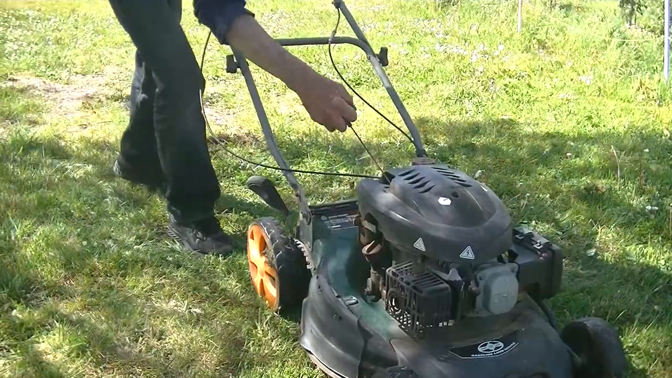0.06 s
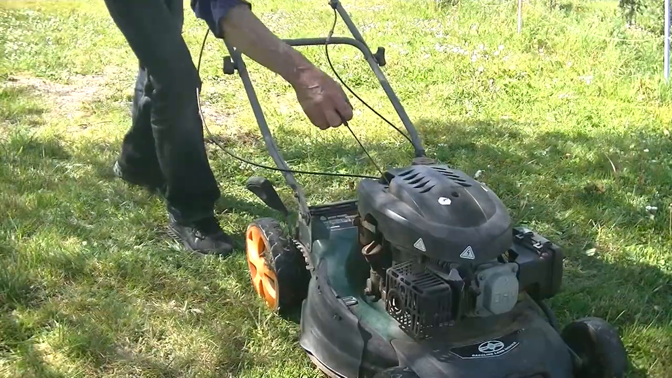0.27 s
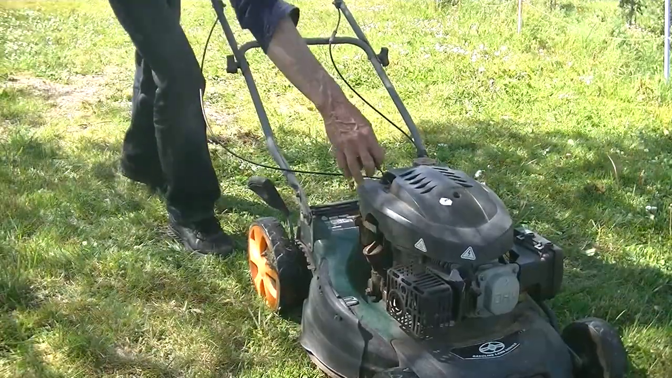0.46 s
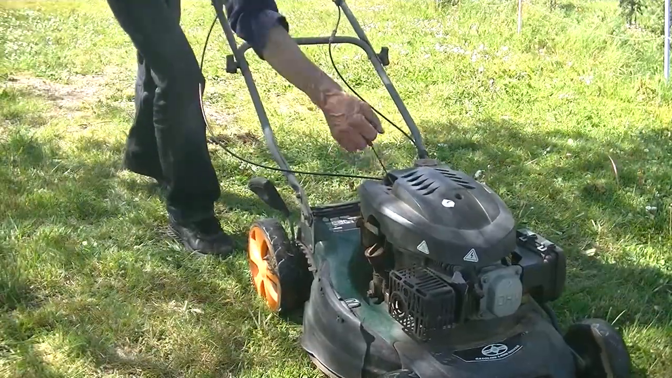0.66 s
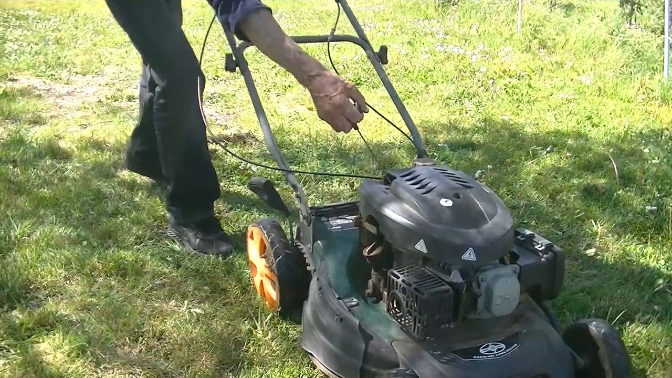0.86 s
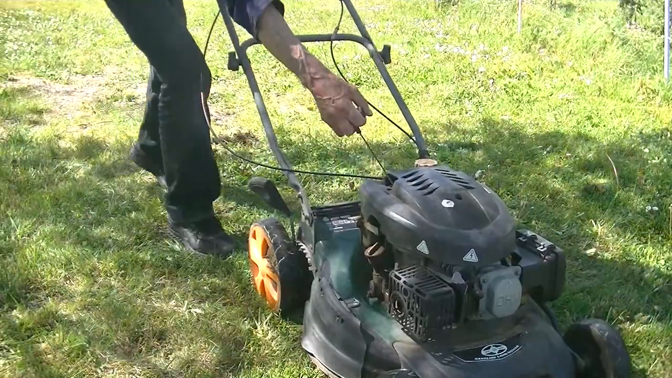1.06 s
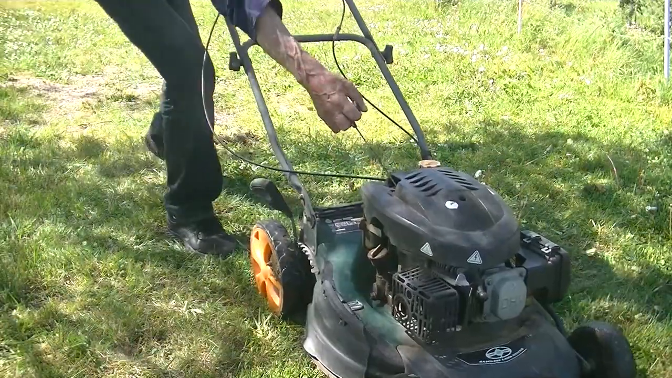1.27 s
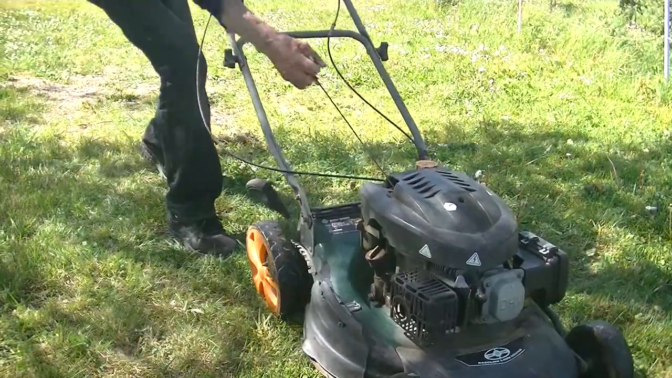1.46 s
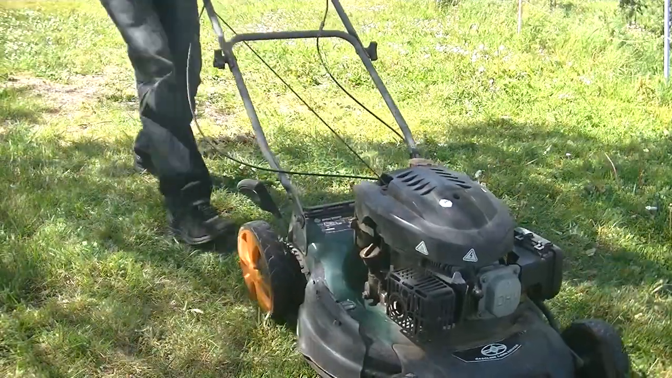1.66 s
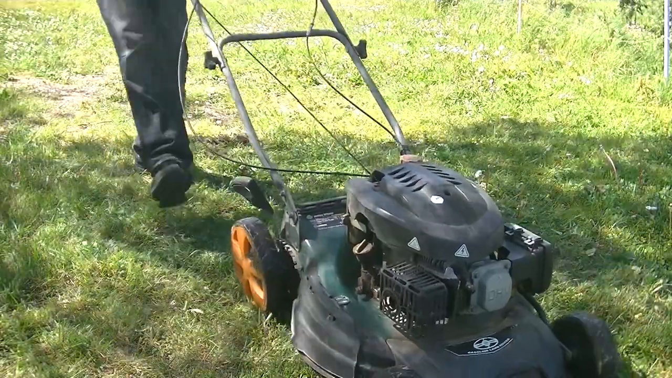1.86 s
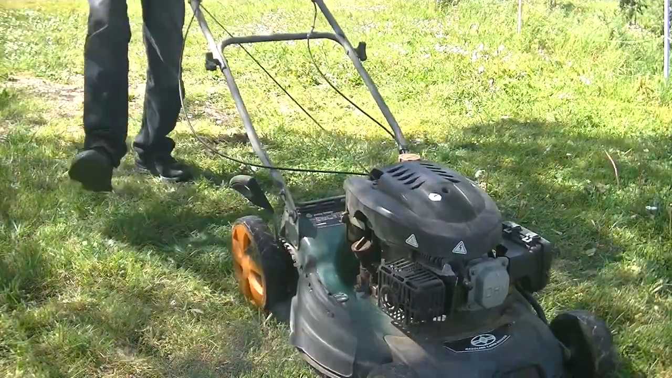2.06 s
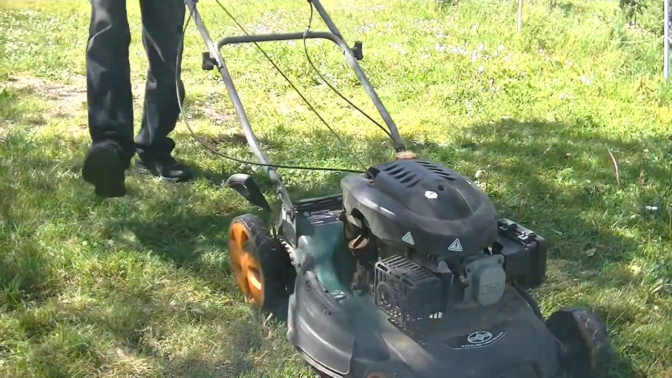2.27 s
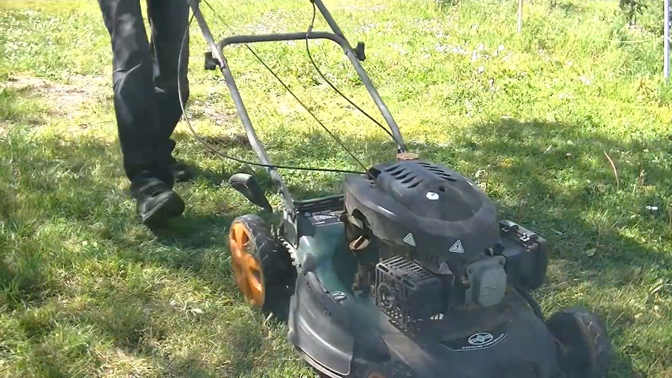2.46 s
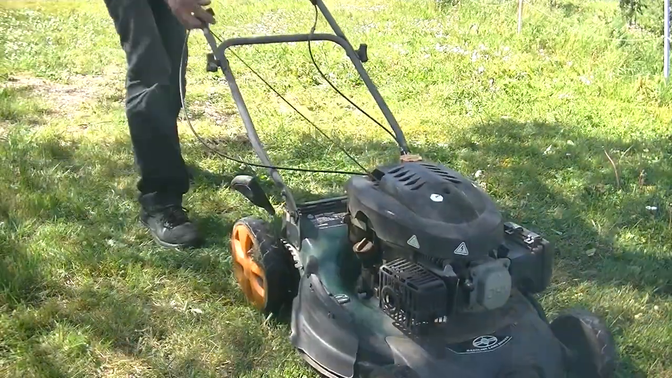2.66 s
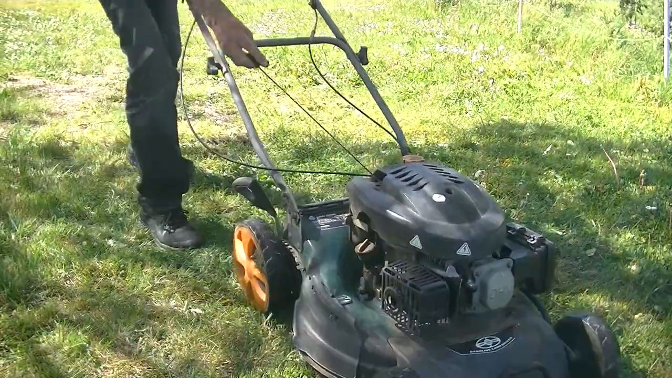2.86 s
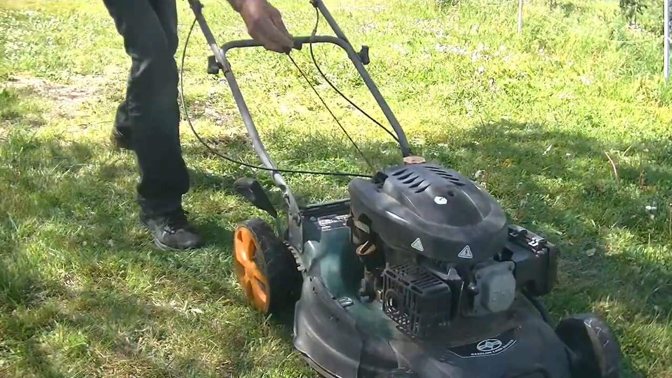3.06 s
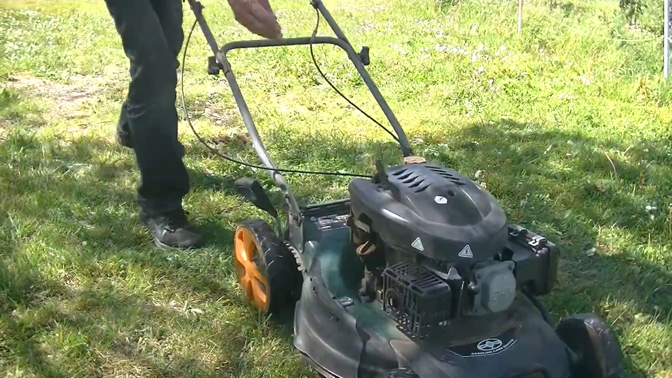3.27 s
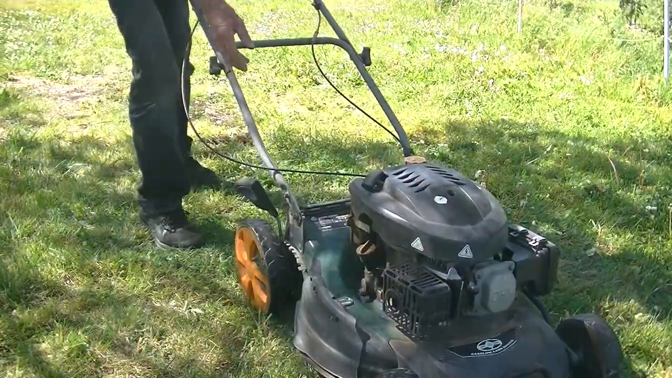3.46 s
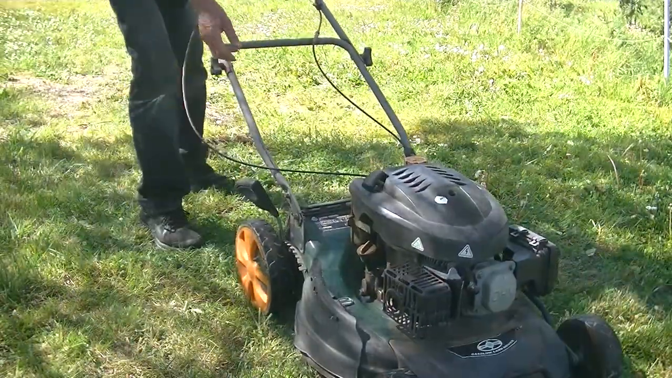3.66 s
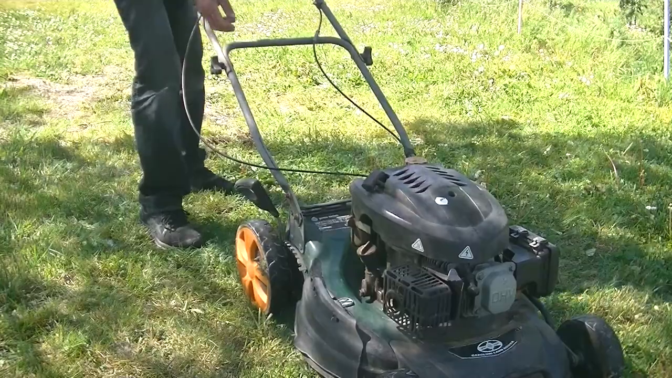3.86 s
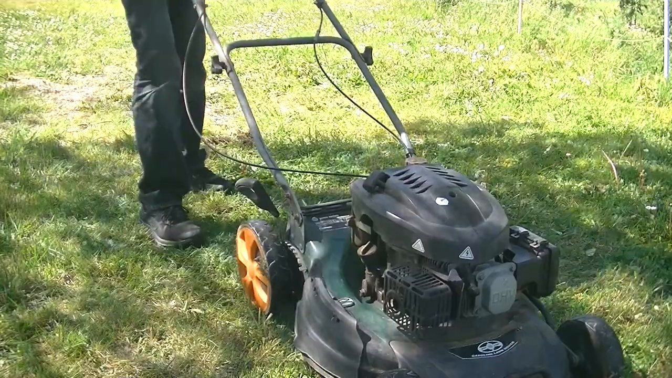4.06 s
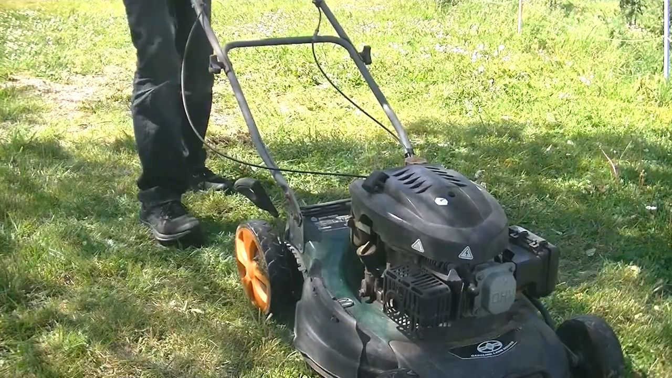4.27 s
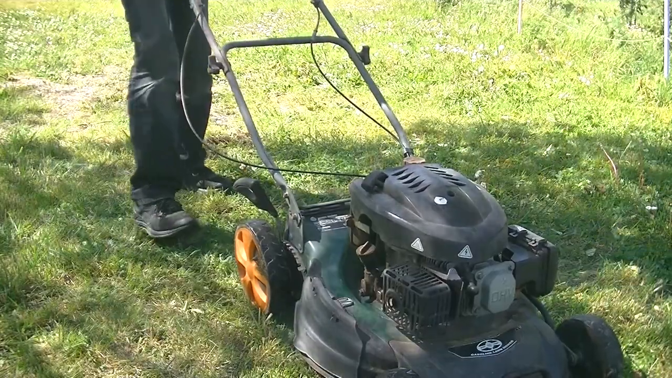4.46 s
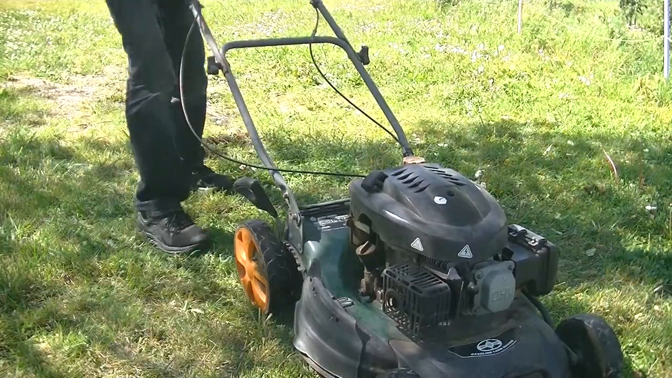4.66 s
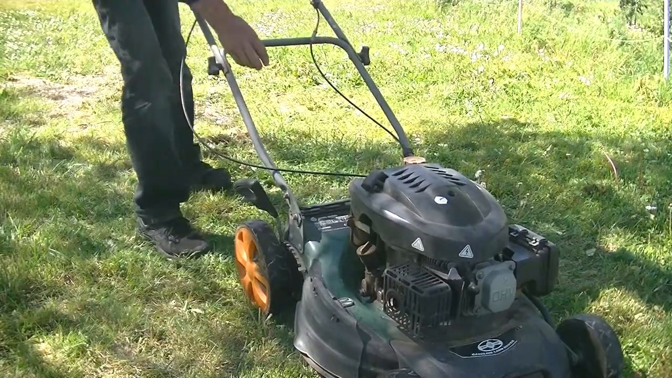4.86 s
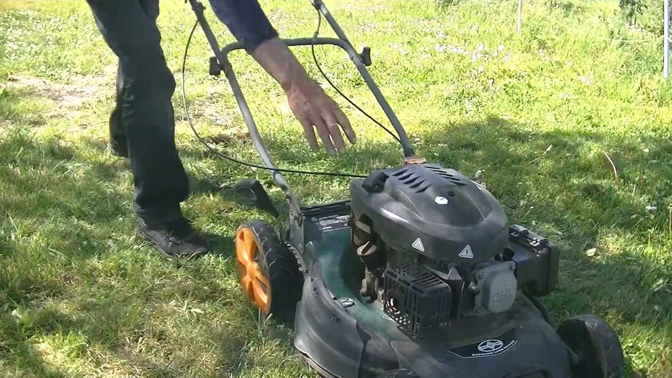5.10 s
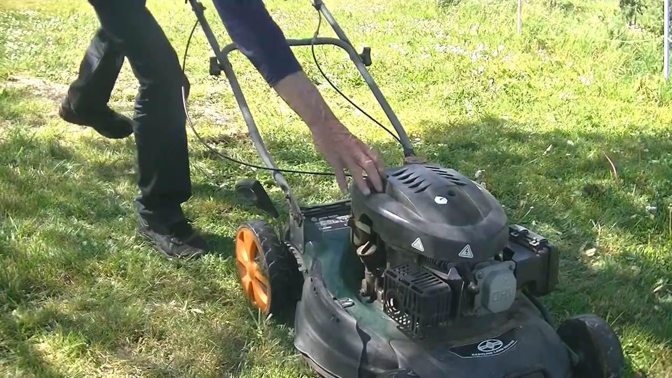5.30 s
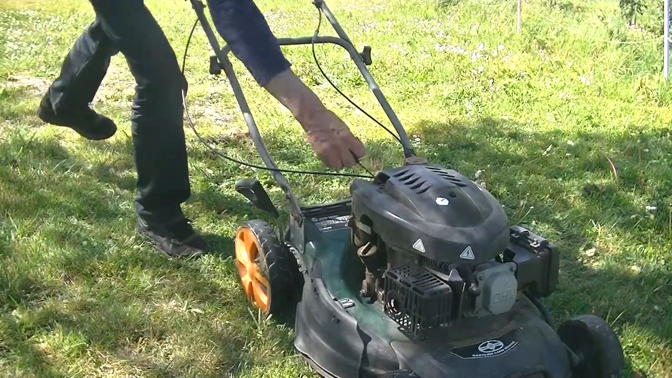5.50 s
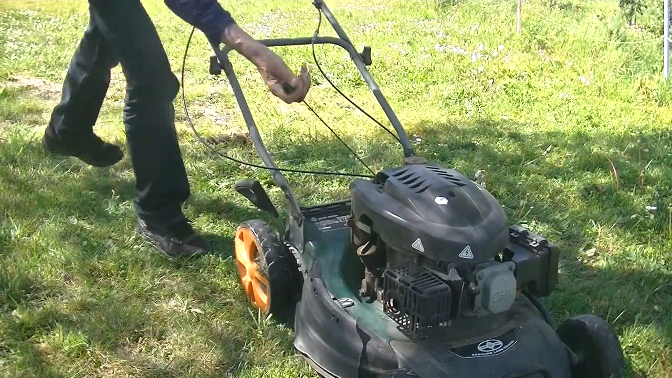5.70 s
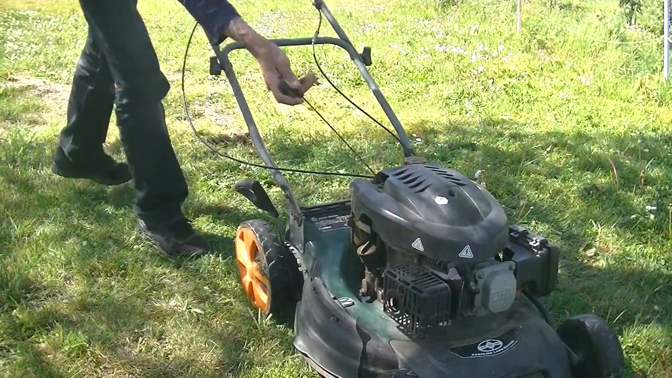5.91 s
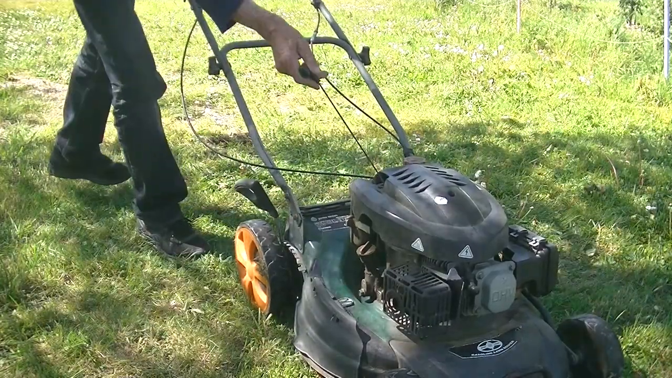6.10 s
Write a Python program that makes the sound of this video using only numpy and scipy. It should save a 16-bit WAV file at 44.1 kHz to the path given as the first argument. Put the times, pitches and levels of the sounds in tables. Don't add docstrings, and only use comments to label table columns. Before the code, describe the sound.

A small petrol lawn mower is pulled into life in a quiet garden, its clattering engine settling to a rapid even throb with a few sharp clacks.

```python
import sys
import numpy as np
from scipy import signal
from scipy.fft import rfft, irfft, next_fast_len
from scipy.io import wavfile
from scipy.ndimage import uniform_filter1d

SR = 44100
rng = np.random.default_rng(int(sys.argv[2]) if len(sys.argv) > 2 else 0)


def materialize(psi):
    bounded = np.clip(np.atleast_2d(psi).T, -1, 1)
    quanta = np.round(bounded * 32767).astype(np.int16)
    wavfile.write(sys.argv[1], SR, quanta)


def boost(x):
    u = np.asarray(x, float) / 20
    return 10 ** u


N = 270893

# (time [s], casing clatter [dB], throttle opening [0-1 once running, beyond that range at
ENGINE = [(1.4, -76, 1.0), (1.5, -74, 1.2), (1.58, -62, 0.7), (1.64, -60, 0.2), (1.66, -52, -.6),
          (1.73, -49, 0.46), (1.8, -50.5, 0), (1.87, -46, 0), (1.95, -45.5, 0.06), (2.38, -43.5, 0.13),
          (2.45, -45, 0.35), (2.75, -44, 0.1), (3.87, -44.5, 0.22), (3.93, -44, 0.55), (5.3, -44, 0.86),
          (5.6, -46.5, .8), (5.85, -44.5, 0.83), (6.14, -45.5, 0.99)]
# (place in cycle [share], level re steady rattle [dB], tilt [dB per octave],
# rise [share of cycle], fall [s], pressure pulse [about -1..1])
CONTACTS = [
    (-.05, 2.5, -2.5, 0.12, 0.002, -0.29),
    (-.02, 12.5, 3, 0.01, 0.0031, -1.18),
    (0.312, -1, -3.5, 0.024, 0.0048, 0.32),
    (.42, 5, -0.5, 0.035, 0.0042, 0.44),
    (0.572, -4.5, 2, 0.085, 0.01, -0.12),
    (.66, 2.5, -2.3, 0.038, 0.0033, .1),
    (0.812, 0, -3, 0.016, 0.0081, -0.42),
]
# (time [s], length [s], level [dB], hardness [dB], mode struck squarely [Hz])
JINGLE = [
    (.731, .01, -55, 8, 2878),
    (1.905, .055, -36, -3, 2878),
    (3.342, .026, -49, 11, 9680),
    (5.512, .08, -37.5, 4.5, 3131),
    (5.603, .075, -38, 3.5, 2712),
    (5.69, .04, -38, 3, 3131),
    (5.741, .028, -37, -1, 2878),
    (6.063, .012, -36, 6, 2878),
]
RUB_RISE_S = 0.0084
CATCH_S = 2.04


def rms_one(x):
    return x / np.sqrt(np.mean(x ** 2) + 1e-20)


def in_time(rows, outside=None):
    s, *columns = np.transpose(rows)
    return [np.interp(np.arange(N) / SR, s, c, outside, outside) for c in columns]


def at_hz(points, hz):
    points = np.array(points)
    return np.interp(np.log(hz + 1), np.log(points[:, 0] + 1), points[:, 1])


def shaped(x, gain):
    size = next_fast_len(N + 4096)
    return irfft(rfft(x, size) * gain(np.fft.rfftfreq(size, 1 / SR)), size)[..., :N]


def band(x, low_hz, high_hz):
    sos = signal.butter(2, [low_hz, min(high_hz, .45 * SR)], "band", fs=SR, output="sos")
    return signal.sosfilt(sos, x)


def resonance(x, hz, width_hz):
    r = np.exp(-np.pi * width_hz / SR)
    feedback = [1, -2 * r * np.cos(2 * np.pi * hz / SR), r * r]
    return signal.lfilter((1 - r * r) / 2 * np.array([1, 0, -1]), feedback, x)


def ring(clicks, hz, t60):
    width_hz = np.log(1000) / np.pi / t60
    return resonance(clicks + 1e-18, hz, width_hz) * SR * t60 / np.log(1000) / 2


def grit(per_s, spread_db):
    sizes = boost(spread_db * np.minimum(rng.exponential(1, N), 5)) * rng.choice([-1, 1], N)
    return rms_one(sizes * (rng.random(N) < per_s / SR))


def garden(patchy_db):
    # (frequency [Hz], level [dB per Hz])
    garden_colour = [(35, -76), (60, -44), (121, -24), (217, -9.5), (287, -16.5), (315, -10), (346, -7),
                     (636, -11.5), (1740, -9), (1950, -6), (2090, -5), (4200, -5), (5000, -13), (6600, -14),
                     (12700, -27.5), (16000, -25)]
    # (frequency [Hz], likeness [-1..1])
    likeness = [(60, -0.5), (180, 0.5), (550, 0.9), (1650, 0.81), (4970, 0.65), (15000, -0.26)]
    level_db = -61.5
    mid, side = rng.standard_normal((2, N))
    alike = lambda hz: np.clip(at_hz(likeness, hz), -1, 1)
    mid = shaped(mid, lambda hz: boost(at_hz(garden_colour, hz)) * np.sqrt(1 + alike(hz)))
    side = shaped(side, lambda hz: boost(at_hz(garden_colour, hz)) * np.sqrt(1 - alike(hz)))
    drift = rms_one(uniform_filter1d(rng.standard_normal(N), size=5000))
    return boost(level_db + patchy_db * drift) * rms_one(np.array([mid + side, mid - side]))


def knocks():
    # (frequency [Hz], width [Hz], level [dB])
    cover = [(1214, 47, -1.5), (1550, 97, 6.5), (2043, 49, 7.5)]
    # (dull part re crack [dB], hollow part [dB], bright part [dB], t60 [s], ring [dB])
    pawl = (-29.5, -12.5, -34, 0.05, -11)
    tick = (-25.5, -15, -5.5, 0.08, -16)
    thump = (-2.5, -6.5, -17, .035, -3.5)
    clack = (-30, -16, -17, .03, -9)
    snap = (-30, -10, -12, .006, -7.5)
    # (time [s], peak [dB], ring [Hz])
    pawl_hits = [(.071, -36, 1144), (.1293, -37, 1610), (.175, -51, 1150), (.199, -40, 1140),
                 (.3023, -37, 4330), (.3124, -41, 4080), (.3812, -45, 3600), (.837, -38, 1153),
                 (1.123, -41.5, 2130), (1.2192, -44, 2130), (1.2421, -50, 1600), (1.2994, -52, 1150),
                 (1.3289, -47, 3500), (1.3788, -39, 2130), (1.4124, -54, 1000)]
    tick_hits = [(.515, -54.5, 8000), (.7193, -44, 4170), (.7593, -28, 4230), (.998, -52, 7200),
                 (1.1503, -52, 7000), (1.1753, -50.5, 7600), (1.5866, -42, 4600), (1.8523, -28.5, 4400),
                 (1.9392, -32, 4000)]
    thump_hits = [(.0024, -56, 360), (1.4276, -53, 420), (1.4762, -50, 750), (1.5243, -47, 800),
                  (1.5988, -48, 950)]
    clack_hits = [(1.6498, -27, 3150), (1.6734, -24, 2500), (1.712, -31, 2200), (1.7395, -24.5, 3820),
                  (1.7616, -17.5, 3710), (1.816, -25, 2500), (1.8358, -24, 2200), (1.8689, -19.5, 3700),
                  (1.9022, -22, 3780), (3.343, -24, 2520), (3.3805, -22, 4030)]
    snap_hits = [(3.3565, -15, 2200), (5.5485, -17.5, 4400), (5.9575, -21, 3200)]
    ring_outlasts = 1.4
    kinds = [(pawl_hits, pawl), (tick_hits, tick), (thump_hits, thump), (clack_hits, clack), (snap_hits, snap)]
    events = [(*row, *kind) for rows, kind in kinds for row in rows]

    parts, age = np.zeros((5, N)), np.arange(4096) / SR
    rough = rng.standard_normal((len(events), 4096))
    for (s, db, hz, dull_db, hollow_db, bright_db, t60, ring_db), noise in zip(events, rough):
        at = round(s * SR)
        fade_db = -60 * age / np.clip(t60, .005, .09)
        burst = noise * (1 - np.exp(-age / 0.00095)) * boost(db + fade_db)
        ring_level = boost(db + ring_db - 60 * age / t60 / ring_outlasts)
        parts[:4, at:at + 4096] += burst * boost(np.array([[dull_db], [hollow_db], [0], [bright_db]]))
        parts[4, at:at + 4096] += ring_level * np.sin(2 * np.pi * hz * age)

    dull = band(parts[0], 308, 500)
    hollow = sum(boost(db) * resonance(parts[1], hz, width) for hz, width, db in cover)
    boxy = band(parts[1], 850, 2100)
    crack = band(band(parts[2], 2400, 5400), 2000, 5600)
    bright = band(band(parts[3], 6100, 13000), 5500, 15000)
    ringing = band(parts[4], 290, 12000)
    low_parts = boost(22.5) * dull + boost(10.5) * hollow + boost(7.5) * boxy
    return low_parts + boost(4) * crack + boost(-3.5) * bright + ringing


def rubs():
    fall_s, high_db, mid_db = 0.014, -9, -10.5
    fades_db_per_s = 22
    t, out = np.arange(N) / SR, 0
    for s, length, db, hard_db, _ in JINGLE:
        rise = (t - s) / RUB_RISE_S + .5
        fall = (s + length - t) / fall_s + .5
        shape = np.clip(np.minimum(rise, fall), 0, 1) ** 2
        tired = boost(-fades_db_per_s * np.clip(t - s, 0, 1))
        high = boost(high_db + hard_db) * tired
        mid = boost(mid_db + hard_db / 2) * tired
        out = out + boost(db) * shape * np.array([high, mid, 1 + 0 * t])
    return out


def starter_cup(high_db, mid_db, low_db):
    # (frequency [Hz], level [dB], t60 [s])
    cup_modes = [(2712, 3.5, .22), (2878, 2.5, .22), (2972, -1, .16), (3131, 2, .2), (6615, -1.5, .1),
                 (6847, 1.5, .1), (9425, -4, .05), (9680, 0.1, .05), (12600, -11, .04), (12900, -13, .04),
                 (13800, -18, .03), (14250, -17, .03), (15200, -22, .03)]
    first_tick_db, square_hit_db = 26.5, 9
    high, mid, low = rubs()
    ticks = np.array([grit(160, spread_db=2.0) for _ in cup_modes])
    for s, *_, lead_hz in JINGLE:
        square = np.array(cup_modes)[:, 0] == lead_hz
        ticks[:, round((s + RUB_RISE_S / 2) * SR)] = boost(first_tick_db + square_hit_db * square)
    out = 0
    for (hz, db, t60), own_ticks in zip(cup_modes, ticks):
        if hz > 8000:
            drive = boost(high_db) * high
        elif hz > 5000:
            drive = boost(mid_db) * mid
        else:
            drive = boost(low_db) * low
        out = out + boost(db) * ring(drive * own_ticks, hz, t60)
    return out


def crank():
    # (time [s], rate [cycles per s])
    speed = [(1.675, 8.397), (1.85, 10.405), (2.0, 13.765), (2.15, 17.152), (2.3, 19.241), (2.45, 19.925),
             (2.8, 19.847), (3.3, 20.096), (4.0, 20.18), (4.7, 20.324), (5.4, 20.465), (6.14, 20.607)]
    rate, = in_time(speed)
    turns = np.cumsum(rate) / SR
    return turns - turns[round(speed[0][0] * SR)], rate


def richness():
    build_s, lean_out_s = 0.18, 0.39
    t = np.arange(N) / SR
    return np.exp(np.where(t < CATCH_S, (t - CATCH_S) / build_s, (CATCH_S - t) / lean_out_s))


def engine_state():
    level_db, opening = in_time(ENGINE)
    t, rich = np.arange(N) / SR, richness()
    body_db = -8.5 + 9 * opening + 0.5 * rich
    top_db = -5 - 1.5 * opening + 4.5 * rich
    bass_db = -22.5 + 4 * rich
    punch_db = 2.5 - 3.5 * opening + 4.3 * rich
    hush_db = np.where((t > CATCH_S - .03) & (t < 2.41), 30 * rich, -2)
    return level_db, body_db, top_db, bass_db, punch_db, hush_db


def contact_bursts(turns, rate, punch_db, scatter_db, jitter_s):
    weak_cycles = (11, 13, 15, 17)
    bursts = []
    for share, db, tilt, rise, fall, _ in CONTACTS:
        cycle = np.round(turns - share).astype(int)
        luck = rng.standard_normal((200, 2))[cycle]
        late = (turns - share - cycle) / rate + jitter_s * luck[:, 0]
        shape = np.exp(np.where(late < 0, late * rate / rise, -late / fall)) * (cycle > 0)
        if abs(share) < .1:
            shape = shape * np.where(np.isin(cycle, weak_cycles), boost(-13), 1)
        bursts.append((cycle, shape * boost(db + punch_db + scatter_db * luck[:, 1]), tilt))
    return bursts


def clatter(turns, rate, scatter_db, band_scatter_db, jitter_s, flutter_db):
    # (frequency [Hz], level [dB per Hz])
    engine_colour = [(35, -67), (60, -53.5), (236, -5), (291, -13), (464, -7), (673, -7.5), (1120, -1.5),
                     (1910, -3), (2530, -6), (2840, -5), (4320, 1), (5710, -10.5), (6560, -7),
                     (11700, -28.5), (15500, -23.5)]
    # (frequency [Hz], width [Hz], level [dB])
    casing = [(437, 123, -11), (1145, 33, -40), (2575, 25, 0), (7500, 17, 15), (2500, 234, 11),
              (3426, 74, -7), (5260, 73, -19), (6560, 27, -22), (7600, 76, 12), (8170, 85, 15),
              (10780, 670, -18)]
    hush = (.08, .29)
    hop = 16
    level_db, body_db, top_db, bass_db, punch_db, hush_db = [c[::hop] for c in engine_state()]
    turns, rate = turns[::hop], rate[::hop]
    shut = (turns % 1 > hush[0]) * (turns % 1 < hush[1]) * (turns > 3)
    steady_db = -hush_db * uniform_filter1d(1. * shut, size=9)
    bursts = contact_bursts(turns, rate, punch_db, scatter_db, jitter_s)

    sources, out = [grit(16000, spread_db=1.1), grit(16000, spread_db=1.1)], 0
    band_edges = 62.5 * 2 ** np.arange(0, 8.6, .5)
    for k, (low, high) in enumerate(zip(band_edges, band_edges[1:])):
        hz = np.sqrt(low * high)
        muffled = np.clip(1.5 - 0.46 * np.log2(hz / 500), .45, 2)
        flutter = rms_one(uniform_filter1d(rng.standard_normal(len(turns)), size=40))
        power = boost(2 * muffled * steady_db + 2 * flutter_db * flutter)
        for cycle, burst, tilt in bursts:
            own_db = band_scatter_db * rng.standard_normal(200)[cycle]
            power = power + (burst * boost(tilt * np.log2(hz / 2500) + own_db)) ** 2
        power = power / uniform_filter1d(power, size=800)
        part_db = 0
        for weight, curve in zip(np.eye(4), (bass_db, body_db, 0 * top_db, top_db)):
            share_here = np.interp(np.log(hz), np.log([170, 650, 2900, 8000]), weight)
            part_db = part_db + share_here * (curve - np.mean(curve[turns > 20]))
        gain = np.sqrt(power) * boost(level_db + part_db)
        out = out + np.interp(np.arange(N) / hop, np.arange(len(gain)), gain) * band(sources[k % 2], low, high)

    out = out + sum(boost(0.083 * db) * resonance(out, hz, width) for hz, width, db in casing)
    colour_db = lambda hz: at_hz(engine_colour, hz) - at_hz(engine_colour, 3000) - 8 * (hz < 265)
    started = np.arange(N) > ENGINE[0][0] * SR
    return boost(12) * shaped(out, lambda hz: boost(colour_db(hz))) * started


def squeak():
    # (time [s], pitch [Hz], level [dB])
    whistle = np.array([(1.53, 1250, -70), (1.59, 1550, -57), (1.625, 1950, -52), (1.642, 2230, -47),
                        (1.65, 2260, -72)])
    hz, = in_time(whistle[:, :2])
    db, = in_time(whistle[:, ::2], outside=-150)
    slip = rms_one(uniform_filter1d(rng.standard_normal(N), size=300))
    phase = 2 * np.pi * np.cumsum(hz * (1 + .015 * slip)) / SR
    return boost(db - 1 + 3 * slip) * np.sin(phase)


def pops(turns):
    # (frequency [Hz], level [dB], t60 [s])
    silencer = [(232, -0.69, 0.055), (326, 1, 0.052), (503, -2, 0.028)]
    fired = np.diff(np.floor(turns + .06), prepend=0) * (turns > 0)
    luck = rng.standard_normal((len(silencer), N))
    rich = richness()
    clicks = fired * np.sqrt(rich) * (rich > .12) * boost(-43.5 + 2.5 * luck)
    thumps = sum(boost(db) * ring(c, hz, t60) for c, (hz, db, t60) in zip(clicks, silencer))
    return band(thumps, 160, 850)


def exhaust_tones(turns, level_db, wander_db, wander_rad):
    # (multiple of the cycle rate [count], level [dB])
    exhaust = [(1, -46), (2, -55), (3, -44), (4, -30.5), (5, -32), (6, -19), (7, -20.5), (8, -11.5),
               (9, -10.5), (10, -16), (11, -14), (12, -4), (15, -11), (16, -1), (17, -6.5), (18, -11.5),
               (19, -2.5), (20, -2), (21, -2.5), (22, -3.5), (23, -2), (24, 0), (25, -8), (26, -8.5),
               (27, -15.5), (28, 0.5), (29, -16), (31, -10.5), (32, -5), (33, -14)]
    clatter_db, body_db, top_db, bass_db, *_ = engine_state()
    share, height = np.array(CONTACTS)[:, [0, 5]].T
    out = 0
    for multiple, db in exhaust:
        start = np.angle(np.sum(height * np.exp(-2j * np.pi * multiple * share)))
        drifts = rng.standard_normal((2, 64))
        slow = [np.interp(np.arange(N) * 9 / SR, np.arange(64), row) for row in drifts]
        load_db = np.interp(multiple, [13, 17], [0, 1]) * (body_db - bass_db - 22) + bass_db + 5
        wander = (multiple / 20) ** 2
        phase = 2 * np.pi * multiple * turns + start + wander_rad * wander * slow[1]
        out = out + boost(db + load_db + wander_db * wander * slow[0]) * np.cos(phase)
    return boost(clatter_db + level_db) * out * np.clip((turns - 2) / 9, 0, 1)


def handle():
    # (time [s], frequency [Hz], level [dB], t60 [s])
    grip = (3.3825, 1900, -22, .03)
    s, hz, db, t60 = grip
    tap = boost(db) * (np.arange(N) == round(s * SR))
    return band(ring(tap, hz, t60), hz / 2.0, hz * 2.3)


def ports(noisy, ringing):
    # (delay [s], level [dB])
    echoes = [(.0031, -17), (.011, -23), (.023, -22), (.041, -24)]
    # (frequency [Hz], left-right level [dB], left leads by [radians], sound common to both [share])
    port_table = np.array([(400, 0, 0, .996), (1500, -1.6, 0, .99), (3350, -6, .05, .99),
                           (4000, -1.8, .2, .98), (5050, -5.5, .6, .92), (5500, 0, 1.6, .8),
                           (6000, 10.5, .3, .5), (6700, 8, 0, .93), (7900, 11, -1, .78),
                           (8700, 0, -1.7, .65), (9400, -3, -1.8, .55), (10100, -12, -.5, .5),
                           (11000, -3, .3, .68), (12000, -1, -.6, .3), (13500, -1.5, -.3, .55)])
    x = np.array([noisy, ringing])
    reflected = sum(boost(db) * np.pad(x, ((0, 0), (round(s * SR), 0)))[:, :N] for s, db in echoes)
    noisy, ringing = x + reflected
    left_db, lead, common = [lambda hz, c=c: at_hz(port_table[:, [0, c]], hz) for c in (1, 2, 3)]
    half = lambda hz: boost(left_db(hz) / 2) * np.exp(.5j * lead(hz))
    flicker = uniform_filter1d(uniform_filter1d(rng.standard_normal((2, N)), size=18), size=18)
    scattered = np.tanh(4 * rms_one(flicker)) * shaped(noisy, lambda hz: np.sqrt(1 - common(hz)))
    shared = shaped(noisy, lambda hz: np.sqrt(common(hz))) + ringing
    both = band(scattered, 370, 14300) + shared
    return np.array([shaped(both[0], half), shaped(both[1], lambda hz: 1 / half(hz))])


def scene():
    turns, rate = crank()
    engine = clatter(turns, rate, scatter_db=.6, band_scatter_db=1.7, jitter_s=.0006, flutter_db=2.1)
    tones = exhaust_tones(turns, level_db=6, wander_db=1.3, wander_rad=.55)
    cup = starter_cup(high_db=-20.5, mid_db=-20, low_db=-35.0)
    ringing = tones + cup + handle() + squeak() + pops(turns)
    return ports(engine + knocks(), ringing) + garden(patchy_db=0.9)


def roll_off(x):
    return signal.sosfilt(signal.butter(12, 16650, fs=SR, output="sos"), x)


def record(dry):
    # (frequency [Hz], width [Hz], level [dB])
    body_dips = [(5860, 320, -5.5), (11450, 600, -3.5)]
    cutoff_hz = 15950
    dips_db = lambda hz: sum(db * np.exp(-((hz - centre) / width) ** 2) for centre, width, db in body_dips)
    edges_gain = lambda hz: np.clip(hz / 70, 0, 1) * np.clip((cutoff_hz - hz) / 250, 0, 1)
    rounded = .17 * np.tanh(dry / .17)
    coloured = shaped(rounded, lambda hz: boost(dips_db(hz)) * edges_gain(hz))
    return roll_off(coloured)


dry = scene()
out = record(dry)
materialize(out)
```